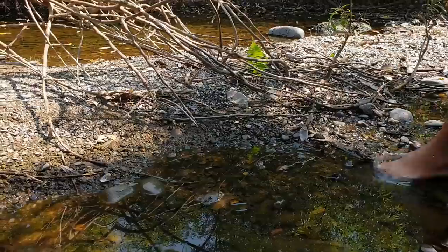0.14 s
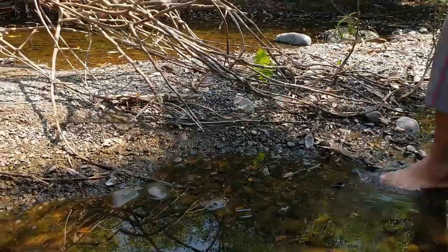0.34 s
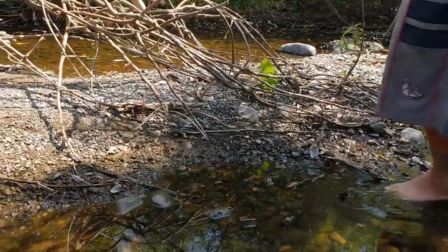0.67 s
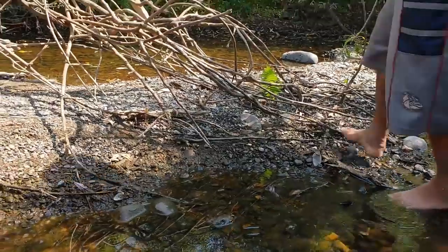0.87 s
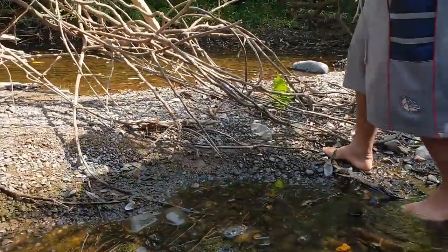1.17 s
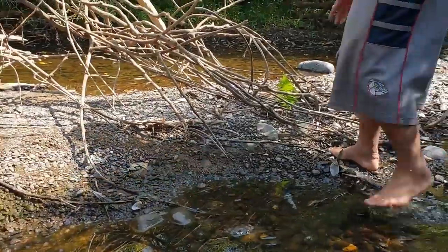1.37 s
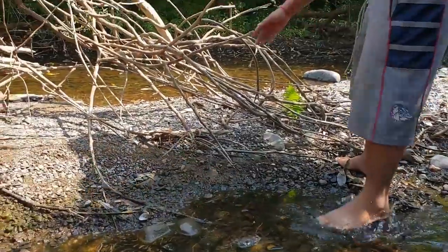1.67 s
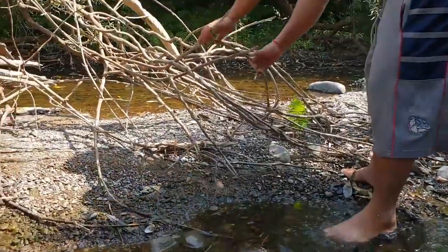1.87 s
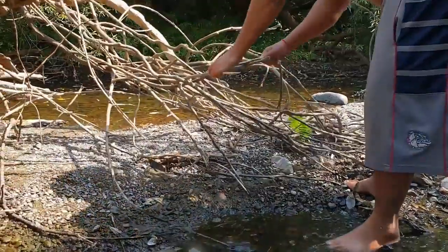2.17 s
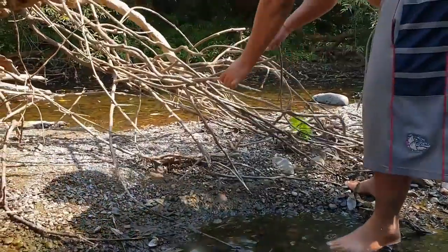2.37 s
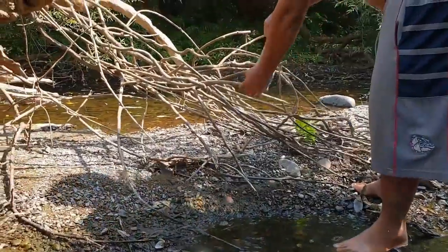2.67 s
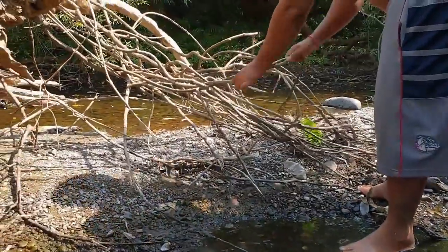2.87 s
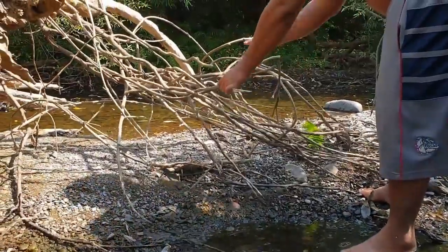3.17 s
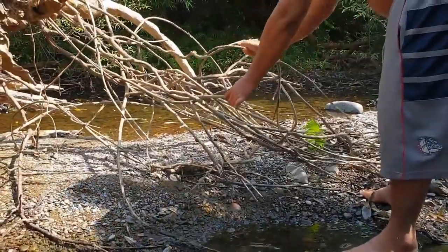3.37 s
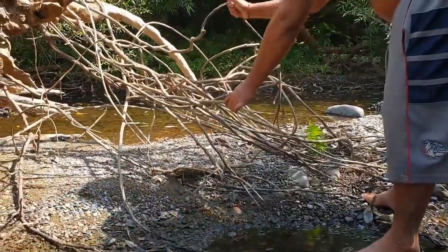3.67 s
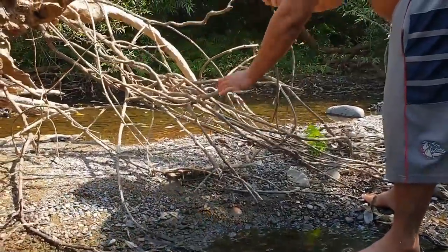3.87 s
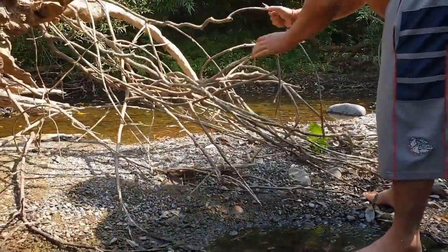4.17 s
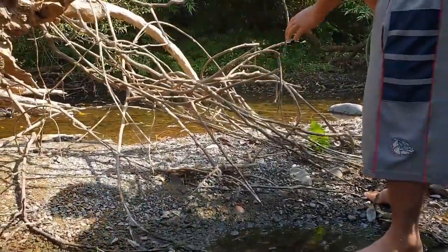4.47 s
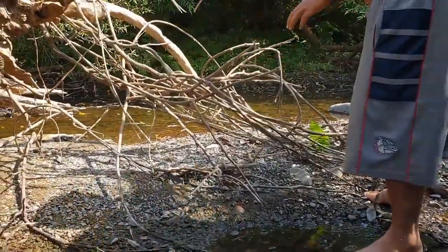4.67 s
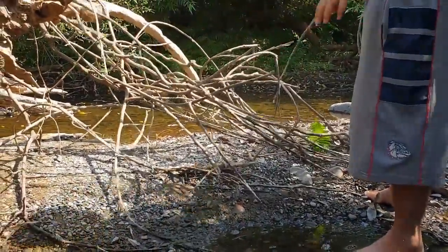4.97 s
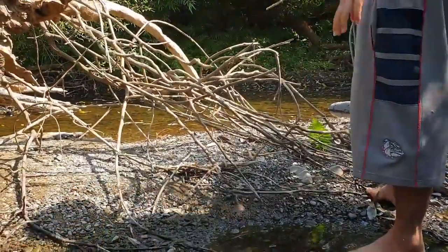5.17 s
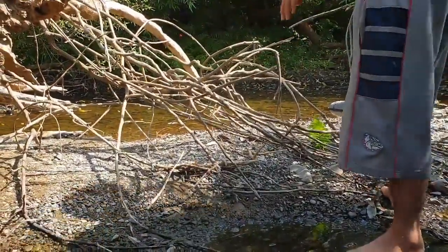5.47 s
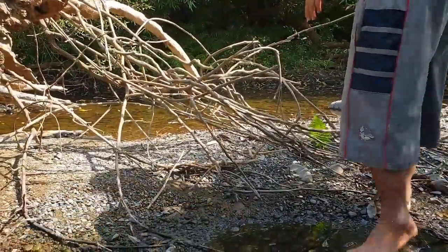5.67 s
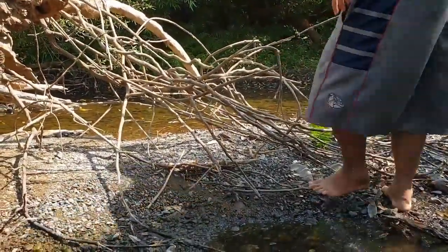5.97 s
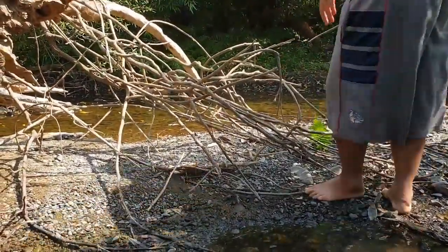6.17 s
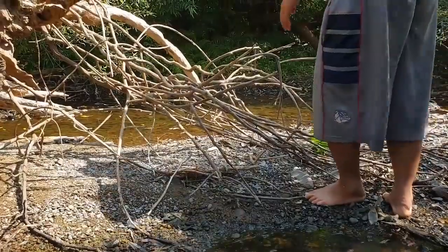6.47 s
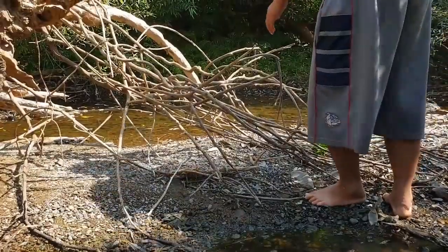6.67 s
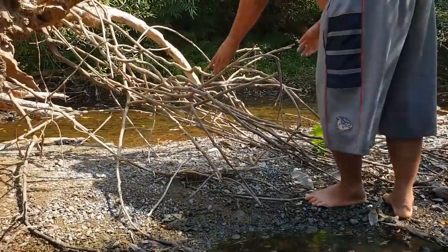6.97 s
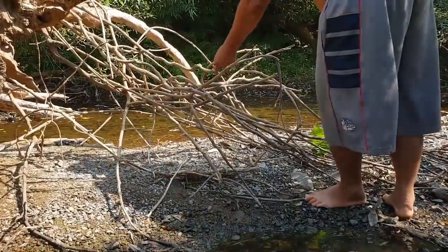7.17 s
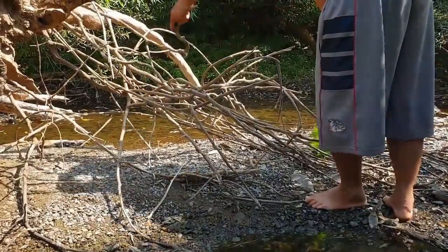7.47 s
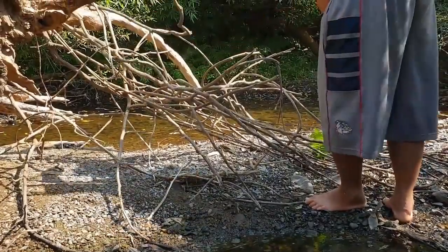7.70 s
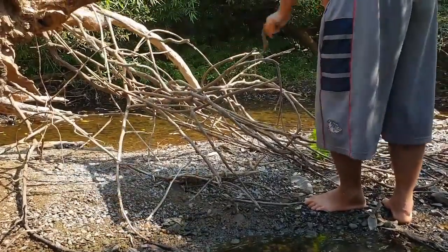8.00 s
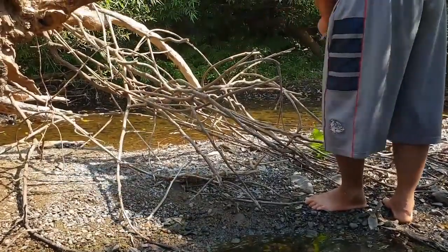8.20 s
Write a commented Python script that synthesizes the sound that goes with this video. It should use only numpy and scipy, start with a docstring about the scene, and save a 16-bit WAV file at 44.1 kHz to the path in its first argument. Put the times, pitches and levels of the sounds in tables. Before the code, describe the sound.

A shallow stream babbles close by over stones, with light wind on the microphone. At about 0.8 seconds it cuts to a quiet pool with a faint woodland hush and low rumble. From 1 to 2 seconds bare feet step through shallow water onto gravel, with small bubbles, gritty crunches and a first sharp crack. From 2 to 3 seconds dry twigs snap off a dead branch in a dense run, with scraping bark and soft, dull thuds; the loudest snap comes near 2.6 seconds. More snaps cluster around 3.5 seconds and between 4.5 and 5. From about 5.8 to 7 seconds come soft wet steps, crunching grit and lighter ticks. From 7.4 seconds a thicker stick is handled, giving lower, woody cracks and knocks, the last just after 8 seconds. The steps and snaps are close and left of centre.

```python
"""Open air, a small stereo microphone. First a shallow stream babbles close by over stones, with wind
on the microphone. At 0.76 s the scene changes to a quiet pool in the far hush of the wood, with a thin
ring near 7 kHz from the microphone's resonance. Someone barefoot at the edge, left of centre, steps
through shallow water onto gravel and breaks dry twigs off a dead branch: bubbles ring, grit crunches,
fibres tear and the branch thuds. Last, from 7.4 s, a thicker, loose stick is handled."""
import sys
import numpy as np
from scipy import signal
from scipy.fft import rfft, irfft, next_fast_len
from scipy.io import wavfile
from scipy.ndimage import uniform_filter1d

SR = 44100
rng = np.random.default_rng(int(sys.argv[2]) if len(sys.argv) > 2 else 0)


def generate_wav(sig):
    """Save sig (samples, or channels by samples) to the path in sys.argv[1] as 16-bit PCM at SR."""
    pcm = np.round(np.clip(np.atleast_2d(sig).T, -1, 1) * 32767).astype(np.int16)
    wavfile.write(sys.argv[1], SR, pcm)


N = 367794

# the far hush of the wood, sinking and returning: (time [s], level [dB])
HUSH_LEVELS = [(0.77, -59.5), (1.51, -60.5), (2.05, -53.5), (2.44, -64), (2.69, -74), (3.36, -71.5),
               (3.66, -68.5), (4.52, -77), (5.11, -60), (5.49, -66.5), (6.27, -59.5), (7.62, -59),
               (8.34, -65)]
# tone of the hush, with the microphone's resonance at 7 kHz: (frequency [Hz], gain [dB])
HUSH_SPECTRUM = [(120, -42.5), (200, -7), (254, -26), (394, -12), (1160, -14.5), (1300, -26.5),
                 (1870, -29.5), (2800, -8.5), (5730, -12.5), (7010, 3.5), (7970, -18), (12200, -21),
                 (16000, -28)]
# tone of the low rumble and of wind on the microphone: (frequency [Hz], gain [dB])
RUMBLE_SPECTRUM = [(25, -37), (40, -7.5), (50, -0.5), (70, -3.5), (130, -8), (250, -34)]
# wind on the microphone by the stream: (time [s], level [dB])
WIND_LEVELS = [(0.0, -52), (0.408, -52), (0.53, -67), (0.75, -60)]
# tone of close water over stones: (frequency [Hz], gain [dB])
STREAM_SPECTRUM = [(120, -37), (200, -16.5), (424, -14.5), (538, -13), (806, -6), (1140, -4), (1420, -2.5),
                   (5730, -9), (7010, -2.5), (7830, -12), (11900, -12.5), (16000, -22)]
# single close bubbles: (time [s], level [dB], pitch [Hz])
BUBBLES = [(0.07, -40, 803), (0.145, -29.5, 1400), (0.27, -37, 1590), (0.353, -35.5, 1450),
           (0.528, -35.5, 935), (0.663, -34.5, 810), (0.691, -41, 2570), (1.24, -63.5, 430),
           (1.366, -37, 716), (1.39, -31.5, 1360), (1.647, -32, 2140), (1.73, -59, 530),
           (1.768, -41.5, 880), (1.774, -52, 490), (1.949, -51.5, 455), (5.896, -41.5, 1480),
           (5.952, -43.5, 2220), (5.992, -45.5, 2420), (6.237, -42.5, 2030), (6.513, -33.5, 1650),
           (6.624, -45.5, 1440)]
# dull thuds as the branch jerks: (time [s], level [dB], pitch [Hz])
THUDS = [(2.216, -35, 77), (2.554, -44.5, 103), (2.655, -41, 102), (2.864, -46.5, 110), (3.554, -35, 326)]
# steady rustle under hands and feet: (time [s], twig level [dB], grit and low crunch re twigs [dB])
RUSTLE_LEVELS = [(0.76, -77.5, -6), (1.35, -55.5, 1.5), (1.53, -56, -6), (1.7, -66, -3.5), (2.29, -48, -5),
                 (2.52, -56, -9), (2.7, -69, -1), (3.34, -69, -5), (3.58, -69.5, -2.5), (4.3, -73, -1.5),
                 (4.85, -70, -1.5), (4.98, -52, 8.5), (5.43, -70, -3), (5.7, -63.5, -6), (6.37, -61, -0.5),
                 (6.84, -63.5, 4), (7.4, -63, -3), (8.34, -70.5, 1)]
# bursts of scraping bark, crunching gravel and splashing:
# (peak time [s], twig level [dB], grit re twigs [dB], low crunch re twigs [dB], length [s])
SCRAPES = [(1.094, -51.5, -1.5, -30, 0.07), (1.389, -56.5, 14, -32, 0.061), (1.615, -36, -2, -47, 0.041),
           (1.691, -51, 13, -14, 0.092), (1.992, -44, -5, -17.5, 0.29), (2.228, -30, -9.5, -19, 0.052),
           (2.591, -38, -12.5, -24.5, 0.095), (3.555, -44, -9, -9.5, 0.032), (3.67, -49, -7, -28, 0.073),
           (3.723, -47, 4.5, -29, 0.018), (3.925, -49.5, -3, -12.5, 0.25), (4.58, -51.5, 0.5, -22, 0.085),
           (4.986, -45, -21, -6, 0.14), (6.207, -53, -1, -47, 0.11), (6.49, -57, 9, -37, 0.2),
           (6.775, -41.5, 2.5, -8, 0.049), (7.043, -48.5, -8, -31, 0.081), (7.531, -31, -8, -9, 0.047),
           (7.703, -34.5, 0.5, -11, 0.048), (7.888, -52, -1, -3.5, 0.047), (7.981, -33, -7.5, -12.5, 0.015),
           (8.024, -44, 0, 1, 0.032), (8.095, -52.5, 2, -1.5, 0.043)]
# tone of the litter underfoot: (frequency [Hz], gain [dB])
LITTER_SPECTRUM = [(76, -45.5), (130, -2), (183, -7.5), (1220, -6.5), (1370, -1.5), (4780, -1.5),
                   (6730, -1), (8070, -9.5), (12600, -3.5), (16000, -16.5)]
# tone common to all cracks: (frequency [Hz], gain [dB])
CRACK_SPECTRUM = [(180, -28.5), (300, -19), (961, -14), (1230, -13), (2250, -5.5), (3700, 0.5), (6960, 0),
                  (8640, -2.5), (14700, 0.5), (16000, -12)]
# three resonances of the twig, then the microphone's near 7 kHz:
# (frequency [Hz], level [dB], time to fall 60 dB [s])
CRACK_MODES = [(972, -38, 0.04), (1496, -35, .03), (2960, -28, 0.033), (6980, -15, 0.02)]
# twig cracks and knocks; the strongest ring is mostly the microphone's resonance near 7 kHz:
# (time [s], level [dB], strongest ring [Hz], body at 1.5 kHz [dB], brightness at 9.8 kHz [dB])
CRACKS = [(1.068, -39.5, 2470, 0, -15), (1.092, -36.5, 7030, -13, -11), (1.194, -35, 6700, -5, -2),
          (1.2547, -31.5, 7260, 7, -5), (1.3753, -27.5, 7070, 14, -5), (1.4397, -39.5, 2660, -6, -25),
          (1.5537, -36, 5300, -5, -5), (1.605, -13.5, 7400, -23, 3.5), (1.642, -29, 2040, 4, -4),
          (1.683, -31.5, 2160, -7, -9), (1.766, -33.5, 3330, 16.5, 3), (1.911, -35, 6700, 15, 4),
          (2.0163, -16.5, 3640, -32, -5.5), (2.072, -20.5, 6650, -11.5, 10.5), (2.078, -25, 6760, -2, 2),
          (2.158, -22.5, 6600, -18, 10), (2.202, -24.5, 6600, -15, 13.5), (2.2074, -19, 5800, -18, 22),
          (2.2154, -11.5, 6570, -23, 14.5), (2.2568, -10, 3740, -2, 2), (2.3328, -18.5, 6600, -26, 12),
          (2.356, -25, 4200, 3, -5), (2.385, -12, 3360, 1, 7.5), (2.3922, -17.5, 5770, -29, 7),
          (2.4209, -20.5, 6780, -9, 4), (2.428, -26, 6500, -18, 13), (2.45, -23, 6300, -7, 3),
          (2.529, -35, 6450, -8, -5), (2.5559, -4.5, 6680, -3, -7.5), (2.6593, -26, 4260, 5, 6),
          (2.8703, -32.5, 6540, -6, 6), (2.9106, -27, 7560, -5, 7), (2.926, -29, 6840, -2, 5),
          (2.9787, -28.5, 6690, -7, 4.5), (3.421, -38.5, 6270, 5.5, 1), (3.4715, -36, 6760, -5, 6),
          (3.4892, -28.5, 7400, 1.5, -5), (3.5317, -25, 5200, -1, 6), (3.5535, -9, 3510, -7, -1.5),
          (3.555, -18.5, 2270, -8, -15), (3.639, -26, 7070, -2, 2.5), (3.646, -28, 6800, -7, 4),
          (3.663, -30, 7150, -7, -1), (3.671, -24.5, 6900, -12, 2), (3.688, -29.5, 6760, -5, 2),
          (3.7617, -30, 6350, -20, 8), (3.9149, -22, 7070, -1, 2), (4.0072, -30.5, 6670, -2.5, -3.5),
          (4.149, -28.5, 3530, 6.5, -2), (4.2498, -34, 6320, 7, 5.5), (4.4089, -38, 6670, 5, -2),
          (4.457, -42, 6660, 2, -5), (4.5027, -34.5, 2410, -14, -10), (4.5387, -18, 6540, -2.5, 2),
          (4.5998, -30.5, 7030, -5.5, -3.5), (4.6308, -31, 6650, -2, -1), (4.7566, -40.5, 6200, -16, 14),
          (4.791, -40, 7100, -24, -1), (4.859, -22, 5350, 0, 15), (4.8815, -14.5, 6450, 2, 10),
          (4.9118, -33.5, 6200, 7, -19), (4.9526, -20, 6900, 1.5, -1), (4.9814, -17, 3650, 8.5, -12.5),
          (5.1535, -33.5, 6600, 10, 1), (5.26, -38, 6400, 16, 8), (5.796, -32.5, 5100, -10, -6),
          (5.863, -36.5, 6600, 3, -1), (6.0, -37.5, 6970, -8, 11), (6.245, -33, 7000, -5, 8),
          (6.3588, -42, 3870, -8, -21), (6.5736, -32.5, 7430, -1, 2), (6.588, -34, 6940, -10, 12),
          (6.7511, -21, 6370, 12, 0), (7.0455, -32, 5100, 8, -0.5), (7.1322, -30.5, 4400, 6, 0),
          (7.468, -26, 7100, -23, 11), (7.478, -21, 6930, -15, 5), (7.4883, -9.5, 6740, -12, 2),
          (7.5254, -11, 3320, 1, -2), (7.5585, -16, 6560, -3.5, -0.5), (7.6256, -24.5, 3040, 8.5, -12),
          (7.6807, -24.5, 2800, 6, 3), (7.8422, -44.5, 2900, 14, -7), (8.0198, -15.5, 6730, -2, 7)]

POOL_S = .758  # the stream ends, the pool begins
LEFT_DB = 8.5  # left over right: hands and feet stay left of centre
STICK_S, STICK_DB = 7.4, 10.5  # from here the thicker stick's low modes ring louder


def undb(db):
    return 10 ** (np.asarray(db) / 20)


def level(x, db):
    return x * undb(db) / np.sqrt(np.mean(x ** 2))


def curve(table):
    """Each column after a table's time column, interpolated to one value a sample."""
    times, *columns = np.transpose(table)
    return [np.interp(np.arange(N) / SR, times, column) for column in columns]


def colour(x, points):
    """Causal filter through (frequency [Hz], gain [dB]) points, by folding the cepstrum."""
    size = next_fast_len(x.shape[-1] + 4096)
    hz, db = np.transpose(sorted(points))
    grid = np.log(np.arange(1, 2050) * SR / 4096)
    cepstrum = irfft(np.interp(grid, np.log(hz), db) * np.log(10) / 20)
    cepstrum[1:2048] *= 2
    cepstrum[2049:] = 0
    impulse = irfft(np.exp(rfft(cepstrum)))
    return irfft(rfft(x, size) * rfft(impulse, size), size)[..., :x.shape[-1]]


def walk(rate):
    """Random drift that glides to a new value rate times a second."""
    hold = int(SR / rate)
    return 1.99 * uniform_filter1d(np.repeat(rng.standard_normal(N // hold + 1), hold), hold)[:N]


def pair(size, alike):
    """Noise at the two microphone ports, with correlation alike."""
    mid, side = rng.standard_normal((2, size))
    return np.sqrt(1 + alike) * mid + np.sqrt(1 - alike) * side * np.array([[1], [-1]])


def sides(pan_db):
    """Port gains with the left pan_db above the right."""
    return undb(np.array([pan_db, -pan_db]) / 2).reshape(2, -1)


def lag(x, samples):
    """The left port hears it this many samples after the right."""
    return np.array([np.roll(x[0], samples), x[1]])


def add(out, s, x):
    start = int(s * SR)
    out[:, start:start + x.shape[-1]] += x[..., :N - start]


def ring(t, hz, t60):
    return np.sin(2 * np.pi * hz * t) * np.exp(-np.log(1000) * t / t60)


def bubble(hz, cycles, glide=0.04):
    """A damped ring whose pitch rises as the bubble nears the surface."""
    turns = np.arange(int(3 * cycles * SR / hz)) * hz / SR
    tone = np.sin(2 * np.pi * turns * (1 + glide * turns / cycles / 6))
    return tone * np.minimum(turns / 0.69, 1) * np.exp(-2.2 * turns / cycles)


def gurgle(count, low_hz, span, cycles, scatter_db, length_s=N / SR):
    """A swarm of small bubbles of uneven pitch, size and place; rms near 1 while it lasts."""
    out = np.zeros((2, N))
    for when, pitch, size, pan in rng.random((count, 4)):
        pop = bubble(low_hz * span ** pitch, cycles * (.5 + pan))
        gain = undb(scatter_db * min(-np.log(1 - size), 3.))
        add(out, when * length_s, pop * gain * sides(8 * pan - 2.5))
    return out / np.sqrt(np.mean(out ** 2) * N / SR / length_s)


def poolside():
    """A wide, far hush with the microphone's thin ring, over a low rumble and the pool's soft burble."""
    hush_db, = curve(HUSH_LEVELS)
    hush = level(colour(pair(N, 0), HUSH_SPECTRUM), 0) * undb(hush_db + 1.1 * walk(60)) * sides(1.7)
    rumble = level(colour(pair(N, 0.75), RUMBLE_SPECTRUM), -11) * undb(hush_db + 1.1 * walk(13))
    burble = gurgle(count=250, low_hz=372, span=1.9, cycles=10, scatter_db=4.5) * undb(hush_db - 19)
    return (hush + rumble + burble) * (np.arange(N) >= POOL_S * SR)


def wind():
    """Gusts buffet the microphone with a low, uneven rumble."""
    wind_db, = curve(WIND_LEVELS)
    return level(colour(pair(N, 0.28), RUMBLE_SPECTRUM), 0) * undb(wind_db + 2.34 * walk(24.8))


def stream():
    """Close to the water, in the wind: small bubbles ring in clumps over fizzing spray."""
    end = int(POOL_S * SR)
    babble = gurgle(count=600, low_hz=376.2, span=12.16, cycles=15, scatter_db=4, length_s=POOL_S)
    babble = colour(babble * undb(1.9 * walk(33.9)), STREAM_SPECTRUM)[:, :end]
    spray = colour(pair(N, 0.12) * undb(walk(59.3)), STREAM_SPECTRUM)[:, :end]
    water = level(babble, -2.9) + level(spray, -1.2) * sides(1.1)
    bank = lag(level(water, -44), samples=19) + wind()[:, :end]
    return np.pad(bank, ((0, 0), (0, N - end)))


def bubbles(cycles=16):
    """Close bubbles ring out in stream and pool, each trailed by three fainter neighbours."""
    out = np.zeros((2, N))
    for s, db, hz in BUBBLES:
        gain = undb(db) * sides(LEFT_DB)
        add(out, s, lag(bubble(hz, cycles) * gain, samples=15))
        for late, pitch in rng.random((3, 2)):
            neighbour = bubble(hz * (0.842 + .45 * pitch), 0.82 * cycles)
            add(out, s + .03 * late, neighbour * gain * undb(-10))
    return out


def thuds():
    """The branch jerks, well to the left: a blunt push that dies within a few cycles."""
    out, t = np.zeros((2, N)), np.arange(int(.1 * SR)) / SR
    for s, db, hz in THUDS:
        add(out, s, undb(db) * np.sin(2 * np.pi * hz * t) * np.exp(-1.8 * hz * t) * sides(12))
    return out


def rustle(linger_s=0.024):
    """Near hands and feet: tiny clicks swell with each scrape, dry twigs on top, grit and water below."""
    twig_db, weight_db = curve(RUSTLE_LEVELS)
    t = np.arange(N) / SR
    gains = undb([twig_db, twig_db + weight_db, twig_db + weight_db - 13]) * (t > RUSTLE_LEVELS[0][0])
    pop_gain = 0
    for s, db, grit_db, low_db, length in SCRAPES:
        swell = undb(db) * np.exp(-np.where(t < s, 5., 2.4) * np.abs(t - s) / length)
        gains += swell * undb([[0], [grit_db], [low_db]])
        pop_gain += swell * undb(grit_db)
    twig_gain, grit_gain, low_gain = gains
    # the heavy branch and the gravel bed answer late and linger
    fade = np.exp(-1 / (linger_s * SR))
    low_gain = signal.lfilter([1 - fade], [1, -fade], low_gain)
    sizes = undb(1.7 * np.minimum(rng.exponential(size=N // 24 + 1), 5)).repeat(24)[:N]
    grains = colour(pair(N, 0.46) * sizes * undb(1.86 * walk(90)), LITTER_SPECTRUM)
    twigs = level(colour(grains, [(2800, -26), (4200, -8.5)]), 0)
    grit = level(colour(grains, [(900, -27), (1400, 5.5), (3600, 15), (5200, -25.5)]), -1.93)
    crunch = level(colour(grains, [(1100, 2.5), (1700, -40.5)]), 0)
    # pebbles click and pockets of water pop inside each burst
    pops = undb(-8) * gurgle(count=1800, low_hz=933, span=5, cycles=9.5, scatter_db=4)
    out = twigs * twig_gain * sides(LEFT_DB)
    out += (grit * grit_gain + pops * pop_gain) * sides(0.39 * LEFT_DB)
    out += crunch * low_gain * sides(0.64 * LEFT_DB)
    return lag(out, samples=5)


def cracks(patter_db=-17, patter_t60_s=0.19):
    """Twigs snap close by: fibres tear, twig and microphone ring, echoes and splinters patter after."""
    out, t = np.zeros((2, N)), np.arange(int(.25 * SR)) / SR
    tear = np.exp(-np.abs(t - .003) / np.where(t < .003, .0009, .002))
    tear += 0.35 * np.exp(-np.abs(t - .003) / 0.000076)  # the last fibre lets go at once
    patter = undb(patter_db) * np.minimum(t / 0.0029, 1) * np.exp(-np.log(1000) * t / patter_t60_s)
    for s, db, hz, body_db, bright_db in CRACKS:
        roughness = undb(rng.standard_normal(len(t) // 32 + 1).repeat(32)[:len(t)])
        burst = roughness * (tear * pair(len(t), 0.28) + patter * pair(len(t), 0.74))
        # thick twigs sound lower, thin ones brighter; a peak marks the strongest ring
        shape = [(1500, body_db), (0.82 * hz, 0), (hz, 6), (1.14 * hz, 0), (9800, bright_db)]
        crack = colour(colour(burst, CRACK_SPECTRUM), shape)
        crack /= np.abs(crack.mean(axis=0)).max()
        ringing = ring(t, hz, 0.032) + undb(-4) * ring(t, 0.68 * hz, 0.035)
        crack += undb(-13) * np.minimum(t / 0.0016, 1) * ringing
        for mode_hz, mode_db, t60 in CRACK_MODES:
            detune, spread = rng.standard_normal(2)
            thick_db = body_db + STICK_DB * (s > STICK_S) if mode_hz < 2000 else 0
            mode = np.minimum(t / 0.0028, 1) * ring(t, mode_hz * (1 + 0.027 * detune), t60)
            crack += undb(mode_db + thick_db + 6.6 * spread) * mode
        add(out, s - .002, lag(crack * undb(db) * sides(LEFT_DB), samples=rng.integers(-6, 9)))
    return out


def scene():
    """The stream bank, then the pool's edge, as they reach the microphone."""
    return stream() + poolside() + rustle() + cracks() + bubbles() + thuds()


def record(dry):
    """The recorder rounds the loudest peaks and cuts the treble above 16.3 kHz."""
    lowpass = signal.ellip(12, .2, 95, 16300, fs=SR, output="sos")
    return signal.sosfilt(lowpass, np.tanh(dry))


dry = scene()
out = record(dry)
generate_wav(out)
```